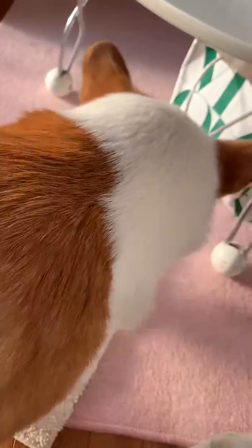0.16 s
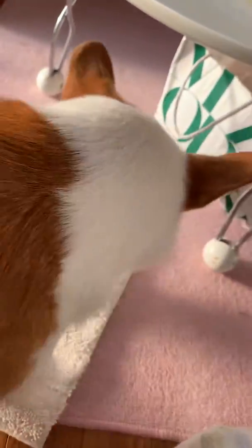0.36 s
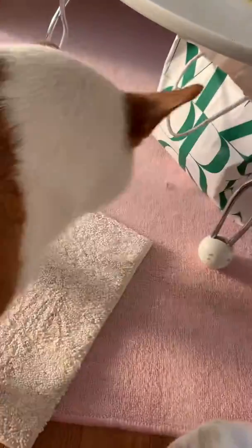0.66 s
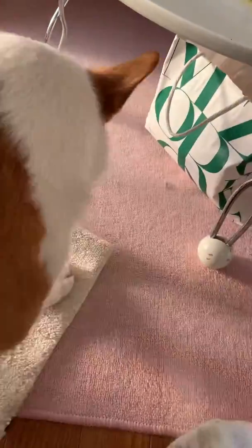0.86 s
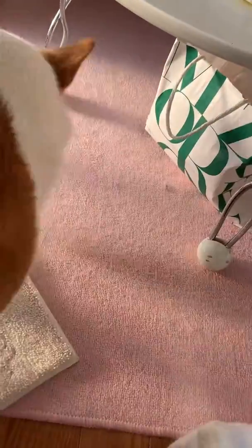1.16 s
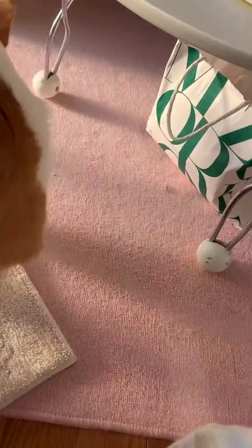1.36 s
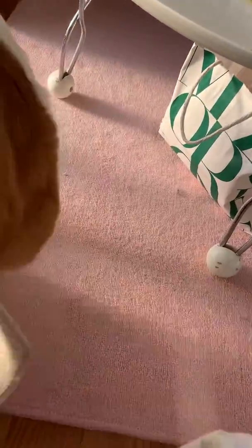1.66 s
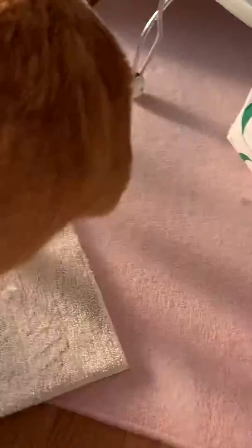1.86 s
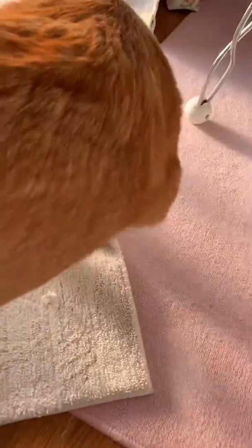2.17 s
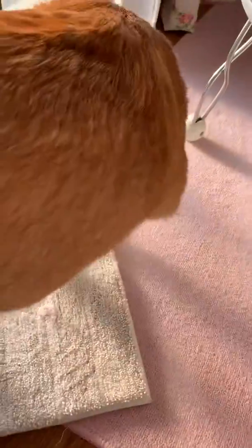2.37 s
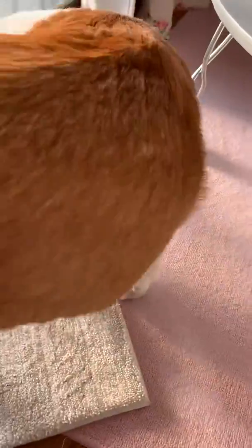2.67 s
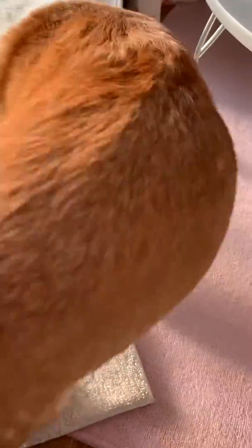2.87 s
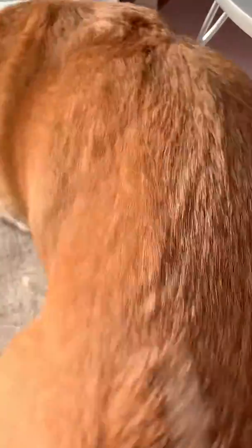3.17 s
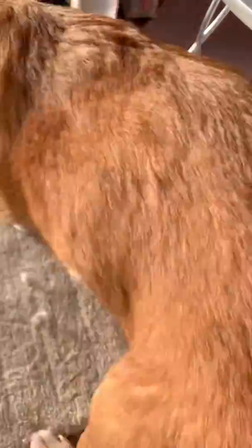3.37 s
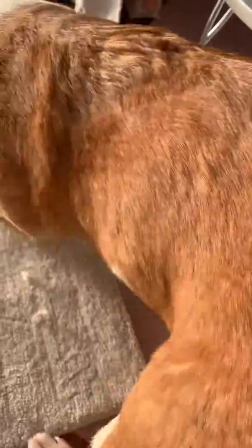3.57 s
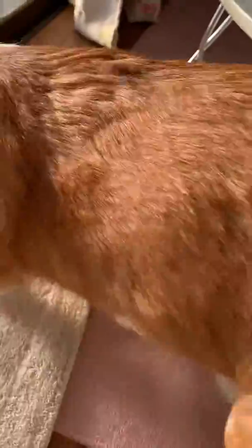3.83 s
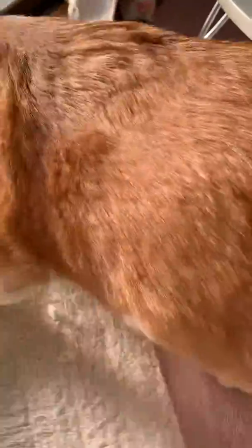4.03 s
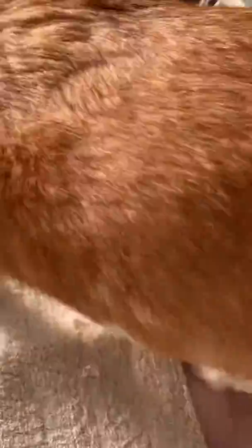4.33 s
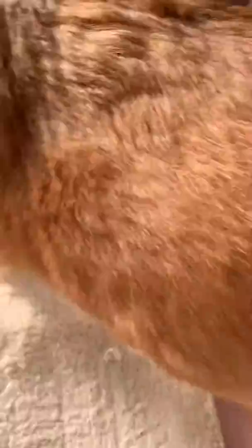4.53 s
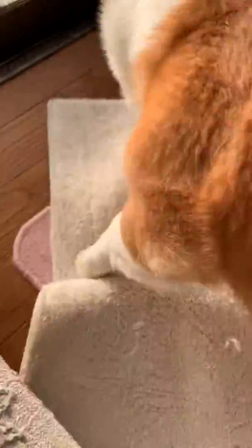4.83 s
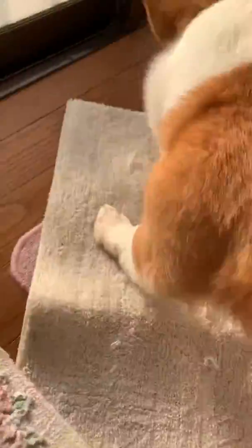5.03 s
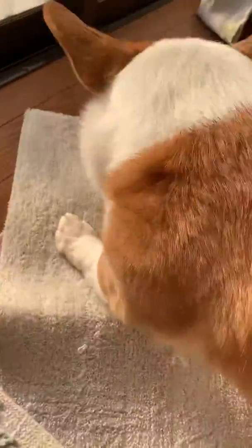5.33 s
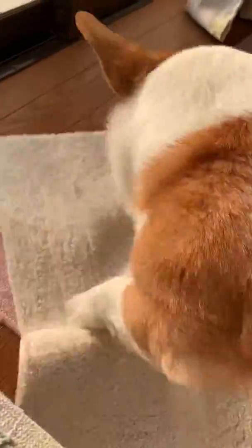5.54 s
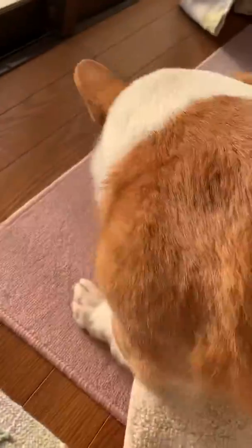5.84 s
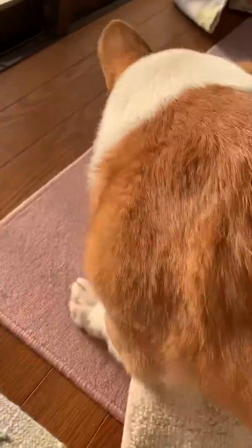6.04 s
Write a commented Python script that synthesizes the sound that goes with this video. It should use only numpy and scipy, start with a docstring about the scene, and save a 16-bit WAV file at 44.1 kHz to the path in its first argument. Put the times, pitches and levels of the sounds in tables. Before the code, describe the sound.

Close in a small quiet room, a dog scratches at a terry towel on a rug over a wooden floor. Four quick scraping strokes with dull paw thumps come first, then a lighter shuffle of soft scuffs, footfalls and small claw ticks, then a longer second bout of heavier rasping drags and thuds. Low floor booms sit underneath, with close stereo hand-held sound.

```python
"""Dog digging at a towel

A dog digs at a terry towel on a rug over a wooden floor, close to a hand-held camera in a small room.
Strokes are slipping-fibre noise: a swish of loops, a rub of folds and a juddering drag on the boards.
Paws land as damped board modes with a claw knock; between two bouts the dog shuffles round with scuffs,
claw ticks of short ringing modes and dull booms of low decaying sines, over quiet room air."""
import sys
import numpy as np
from scipy import signal
from scipy.fft import rfft, irfft, next_fast_len
from scipy.io import wavfile
from scipy.ndimage import uniform_filter1d, map_coordinates

SR = 44100
rng = np.random.default_rng(int(sys.argv[2]) if len(sys.argv) > 2 else 0)


def to_wav(sig):
    """Store sig (one row per channel, or 1-D mono) as 16-bit WAV at the path in sys.argv[1].

    Samples outside -1..1 are clipped; the rate is SR.
    """
    pcm = np.clip(np.atleast_2d(sig), -1, 1) * 32767
    pcm = np.round(pcm).astype(np.int16)
    wavfile.write(sys.argv[1], SR, pcm.T)  # frames by channels


N = 273420


def amp(db):
    """Decibels to gain."""
    return 10 ** (np.asarray(db) / 20)


def unit(x):
    """Scale to rms 1."""
    return x / np.sqrt(np.mean(x ** 2) + 1e-20)


def along(points, hz):
    """(Hz, value) points read on a log frequency axis."""
    f, v = np.transpose(points)
    return np.interp(np.log(hz + 1), np.log(f + 1), v)


def wobble(rate):
    """A smooth random curve with rate knots a second."""
    knots = rng.standard_normal(int(N * rate / SR) + 4)
    return map_coordinates(knots, [np.arange(N) * rate / SR])


def filtered(x, response):
    """x times a complex response of frequency."""
    n = x.shape[-1]
    m = next_fast_len(n + SR // 10)
    return irfft(rfft(x, m) * response(np.fft.rfftfreq(m, 1 / SR)), m)[..., :n]


def coloured(x, spectrum):
    """x shaped by a spectrum, at rms 1."""
    return unit(filtered(x, lambda hz: amp(along(spectrum, hz))))


def add(track, s, sound):
    """Mix a sound into the track at time s in seconds."""
    part = track[..., max(0, round(s * SR)):][..., :sound.shape[-1]]
    part += sound[..., :part.shape[-1]]


def burst(spectrum, t, t60, rise):
    """A brief contact noise that dies away by 60 dB in t60 seconds."""
    noise = coloured(rng.standard_normal((2, len(t))), spectrum)
    return noise * amp(-60 * t / t60) * (1 - np.exp(-t / rise))


def in_room(x, wet_db):
    """The answer of nearby furniture and walls: a noise tail with its own decay in each band."""
    # Each row: frequency in Hz, decay time t60 in s
    room_decay = [(100, 0.23), (350, 0.12), (1000, 0.15), (4000, 0.23), (14000, 0.026)]
    hz, t, z = signal.stft(rng.standard_normal((2, SR // 3)), SR, nperseg=256)
    decay = amp(-60 * t / along(room_decay, hz)[:, None])
    tail = signal.istft(z * decay, SR, nperseg=256)[1]
    # the reflections fade in over about 2 ms
    tail = tail * (1 - np.exp(-(np.arange(tail.shape[1]) / SR / 0.0021) ** 2))
    echo = signal.fftconvolve(x, tail / np.linalg.norm(tail[0]), axes=1)[:, :x.shape[1]]
    return x + amp(wet_db) * echo


def background(drag_db):
    """Quiet room air, and a low rumble that follows the level of the dog's dragging movement."""
    # Rumble and room-air spectra. Each row: frequency in Hz, relative level in dB
    sway_spectrum = [(15, -32.5), (30, -19), (50, -4), (80, -10), (130, -11.5), (300, -40.5), (700, -59)]
    air_spectrum = [(20, -3), (55, 4.5), (120, 4.5), (250, -5), (500, -17.5), (1000, -33), (3000, -34),
                    (8000, -34.5), (16000, -37)]
    movement_db = uniform_filter1d(drag_db, size=SR // 5)  # averaged over 0.2 s
    sway = amp(-33.5 + 0.38 * movement_db) * coloured(rng.standard_normal((2, N)), sway_spectrum)
    air = amp(-64.0) * coloured(rng.standard_normal((2, N)), air_spectrum)
    return sway + air


def swell(start, length, rise, fall, build_db=0):
    """A slide's level in dB: it rises, moves by build_db to reach 0 over its length and falls away."""
    t = np.arange(N) / SR - start
    before = rise * np.minimum(t, 0)
    during = build_db * (np.clip(t / length, 0, 1) - 1)
    after = -fall * np.maximum(t - length, 0)
    return before + during + after


def sliding():
    """Levels in dB of swish, rub and drag: the loudest of strokes, scuffs and brushing coat."""
    # Digging strokes, then light scuffs as the dog shifts its feet. Each row: start in s, length in s,
    # swish of the loops in dB, rub of the cloth in dB, drag on the boards in dB
    strokes = [(0.353, 0.042, -82, -59.5, -46), (0.651, 0.043, -54.5, -56.5, -43.5),
               (0.887, 0.058, -55.5, -49, -38.5), (1.109, 0.07, -45, -46.5, -35.5),
               (3.68, 0.16, -50, -50, -41), (4.014, 0.1, -46.5, -49.5, -37), (4.276, 0.047, -45, -48, -35),
               (4.753, 0.085, -49, -50, -31.5), (5.126, 0.081, -61.5, -51, -36.5),
               (5.461, 0.1, -52, -53, -39), (5.598, .135, -49.5, -50.5, -37)]
    scuffs = [(0.291, 0.018, -87, -64.5, -54), (0.464, .02, -84, -79, -58),
              (0.611, 0.07, -67.5, -62.5, -49), (1.505, 0.033, -83, -69, -60),
              (1.566, 0.05, -69, -53.5, -48), (1.659, .18, -61.5, -57.5, -47),
              (2.136, 0.045, -58, -54.5, -46), (2.288, 0.04, -62, -63.5, -46),
              (2.509, 0.019, -62.5, -57.5, -46), (2.651, 0.016, -61, -55.5, -70),
              (3.029, 0.035, -64, -60, -51.5), (3.247, 0.054, -59, -57, -50),
              (3.908, 0.059, -59.5, -61.5, -55), (4.385, .035, -60.5, -70, -42),
              (4.548, 0.024, -70, -68.5, -56.5), (4.625, 0.17, -59, -75, -70),
              (4.909, 0.069, -63.5, -71, -51), (5.497, 0.036, -63.5, -63, -34),
              (5.786, 0.049, -60.5, -57, -44.5), (6.114, 0.016, -78, -74, -60.5)]
    # How swish, rub and drag (a row each) follow a stroke as the paw presses down.
    # Each row: lag in s, build-up in dB (negative eases off), rise in dB per s, fall in dB per s
    stroke_shape = [(0.002, -1.5, 507.5, 334), (0.012, -1, 457, 385), (0.04, 3.5, 343, 335.5)]
    # The coat brushing the cloth as the body moves. Each row: time in s, level in dB
    coat = [(0, -95), (0.2, -95), (0.32, -78), (0.528, -87), (0.85, -91), (1.03, -65), (1.38, -96),
            (1.93, -73), (2.05, -66.5), (2.4, -73.5), (2.92, -74.5), (3.2, -66.5), (3.5, -83.5),
            (4.1, -80.5), (5.05, -74.5), (5.38, -97), (5.85, -72), (6.0, -92)]
    # Offsets of the coat's swish, rub and drag in dB
    coat_mix_db = [-3.5, 2.5, 7.5]
    coat_db = np.interp(np.arange(N) / SR, *np.transpose(coat))
    levels = []
    for layer, (lag, build_db, rise, fall) in enumerate(stroke_shape):
        level_db = coat_db + coat_mix_db[layer]
        for s, length, *layer_db in strokes:
            stroke_db = layer_db[layer] + swell(s + lag, length, rise, fall, build_db)
            level_db = np.maximum(level_db, stroke_db)
        for s, length, *layer_db in scuffs:
            scuff_db = layer_db[layer] + swell(s, length, rise=600, fall=375)  # dB per s
            level_db = np.maximum(level_db, scuff_db)
        levels.append(level_db)
    return levels


def folds(x, patchy_db):
    """Shifting folds of cloth favour now one band, now another."""
    z = signal.stft(x, nperseg=512)[2]
    field = rng.standard_normal(z.shape[1:])
    field = uniform_filter1d(field, size=4, axis=0)  # across frequency
    field = uniform_filter1d(field, size=7, axis=1)  # across time
    return signal.istft(z * amp(patchy_db * unit(field)), nperseg=512)[1][:, :N]


def friction(spectrum, rate, spread_db, smooth, patchy_db):
    """Fibres slipping rate times a second, in uneven sizes, over a smooth hiss."""
    count = int(rate * N / SR)
    when = ((np.arange(count) + rng.random(count)) * N / count).astype(int)
    sizes = amp(spread_db * rng.standard_normal((2, count)).clip(-2, 2))
    sizes = sizes * rng.choice([-1, 1], (2, count))
    slips = np.array([np.bincount(when, size, N) for size in sizes])
    hiss = smooth * rng.standard_normal((2, N))
    return coloured(folds(unit(slips) + hiss, patchy_db), spectrum)


def towel(swish_db, rub_db, drag_db):
    """Claws comb the loops, folds rub, and the pressed paw judders over the boards."""
    # Spectra of the four frictions. Each row: frequency in Hz, relative level in dB
    swish_spectrum = [(300, -21.5), (1500, -17.5), (3000, -1.5), (5000, -2), (6000, 5), (7500, 2.5),
                      (9500, 1.5), (11500, -18.5), (13500, -16), (16000, -6)]
    sizzle_spectrum = [(4000, -29), (9000, -6), (11000, 5.5), (16000, -14.5)]
    rub_spectrum = [(150, -5), (500, 3.5), (800, -2), (1100, 0.5), (1500, 0), (2200, -2), (3000, -8),
                    (5000, -10), (9000, -23), (16000, -43)]
    drag_spectrum = [(40, -36), (110, -24), (165, 5.5), (205, -4), (260, 4), (350, 0.5), (440, -10.5),
                     (560, -12.5), (800, -16), (2000, -54.5)]
    catch = wobble(90)  # the paw catches and slips on the weave
    combing_db = swish_db + 0.29 * catch + 0.2 * wobble(67)
    loops = friction(swish_spectrum, rate=2000, spread_db=3.5, smooth=0.93, patchy_db=2)
    swish = amp(combing_db - 0.5) * loops
    # a fine sizzle grows faster than the swish, so it stands out on the strongest combing
    fine = friction(sizzle_spectrum, rate=2500, spread_db=5, smooth=.6, patchy_db=2.5)
    sizzle = amp(1.516 * combing_db + 15.0) * fine
    fibres = friction(rub_spectrum, rate=480, spread_db=5.5, smooth=.8, patchy_db=2.6)
    rub = amp(rub_db + 1.5 + 1.55 * catch) * fibres
    judder = friction(drag_spectrum, rate=150, spread_db=0.5, smooth=0.56, patchy_db=-1)
    drag = amp(drag_db - 2.5 + 3.8 * catch) * judder
    return in_room(swish + sizzle + rub + drag, wet_db=-12)


def paws(knock_hz=850, knock_t60=0.012):
    """Each padded blow rings the boards briefly; the knock of the claws rises faster than the thump."""
    # Paws landing. Each row: start in s, level in dB, hard knock of the claws in dB,
    # weight on the pad in dB
    landings = [(0.296, -46.5, -5, 3), (0.375, -24.5, -13, -7), (0.391, -22, -20, -8.5),
                (0.466, -43.5, -1.5, -14), (0.677, -29, -7, -11.5), (0.701, -27, -18, -32),
                (0.723, -27.5, -19, -18.5), (0.946, -35, 0, 2.5), (0.966, -23, -10, -18),
                (1.158, -24.5, -1, -19), (1.211, -22, -21, -21), (1.57, -31, -12, -9.5),
                (1.659, -35, -5, -4.5), (1.977, -29, -10.5, -14.5), (2.316, -29, -31, -14),
                (2.43, -27.5, -20, -30), (2.457, -27.5, -15.5, -31), (2.779, -35, -12.5, -16),
                (3.517, -42.5, -24, -38), (3.777, -24, -21, -22), (3.805, -22, -21, -25.5),
                (4.119, -15.5, -13.5, -33.5), (4.15, -29, -6.5, -14), (4.354, -30.5, 3.5, 1),
                (4.379, -25, -7, -10), (4.748, -24, -8, -21), (4.811, -17, -5, -29),
                (4.836, -16.5, -35, -16.5), (4.859, -11.5, -20, -23.5), (5.006, -34.5, -35, -11.5),
                (5.143, -29, -7.5, -1.5), (5.171, -26, -7, -4), (5.23, -19.5, -31, -29),
                (5.514, -27.5, -10, -6.5), (5.723, -26, -19, -0.5), (5.739, -24.5, -7.5, -5),
                (6.115, -42.5, -18, 1)]
    # Boards under the rug. Each row: centre frequency in Hz, relative level in dB, t60 in s
    boards = [(164.9, 5, 0.14), (185, -4.5, 0.13), (262.2, -6.5, 0.14), (311.6, 2.5, 0.042),
              (346.3, -4.5, 0.1), (390.7, -9, 0.071), (601, -11, 0.041)]
    # Noise of the knock. Each row: frequency in Hz, relative level in dB
    knock_spectrum = [(150, -24), (450, 6.5), (850, 7), (1200, 0), (1800, -4.5), (3000, -15.5),
                      (6000, -25.5), (16000, -38)]
    out, t = np.zeros((2, N)), np.arange(SR // 3) / SR
    hz, mode_db, t60 = np.transpose(boards)[:, :, None]
    deep = hz < 220  # the lowest modes answer to the weight put on the paw
    for s, db, knock_db, weight_db in landings:
        size, detune = rng.standard_normal((2, len(boards), 1))
        strength_db = mode_db + 0.88 * size + deep * weight_db
        ringing = np.sin(2 * np.pi * hz * (1 + 0.028 * detune) * t)
        modes = amp(strength_db - 60 * t / t60) * ringing
        softness = amp(-.45 * (db + 18.5))  # gentle steps set in more slowly
        thump = amp(-0.5) * modes.sum(0) * (1 - np.exp(-t / (0.0039 * softness)))
        toe_hz = knock_hz * (1 + 0.096 * detune[0])
        toe = amp(4.0 - 60 * t / knock_t60) * np.sin(2 * np.pi * toe_hz * t)
        clatter = amp(0.5) * burst(knock_spectrum, t, t60=0.026, rise=0.00049)
        knock = amp(knock_db) * (toe + clatter)
        knock = knock * (1 - np.exp(-t / (0.00077 * softness)))
        add(out, s, amp(db) * in_room(thump + knock, wet_db=-8.5))
    return out


def booms(boom_hz=54, t60=0.27, rise=0.0031):
    """The whole floor gives a few slow cycles under the dog's weight."""
    # Weight coming down on the floor. Each row: start in s, level in dB
    weights = [(0.389, -41), (0.959, -36.5), (1.019, -41.5), (1.18, -30), (2.361, -42), (2.895, -33.5),
               (2.935, -35), (3.271, -39.5), (3.306, -32), (3.91, -40), (3.952, -40), (4.559, -38),
               (4.611, -42), (4.84, -41), (5.2, -32), (5.582, -38), (5.712, -34.5), (5.843, -39.5)]
    out, t = np.zeros((2, N)), np.arange(SR // 2) / SR
    for s, db in weights:
        pitch = boom_hz * np.exp(0.24 * rng.standard_normal())
        envelope = amp(db + 1.5 - 60 * t / t60) * (1 - np.exp(-t / rise))
        add(out, s, envelope * np.sin(2 * np.pi * pitch * t))
    return out


def ticks(t60=0.013, edge_hz=8000):
    """A claw taps as short ringing modes, or a thread snaps free of it with a bright click of noise."""
    # Claws ticking and snagging threads. Each row: start in s, level in dB, strength of the snap in dB
    contacts = [(1.66, -38.5, -1.5), (2.199, -60, 18.5), (2.309, -49, 4.5), (2.503, -34, -24),
                (2.512, -33, -26), (2.535, -30, -35), (2.777, -60.5, 7), (3.2548, -31.5, 7),
                (3.362, -44.5, -16), (3.4466, -58, 4), (3.8985, -43, 14.5), (4.031, -49, -7),
                (4.466, -57, 6.5), (4.644, -60.5, 20.5), (5.219, -22, -19)]
    # A claw on wood. Each row: centre frequency in Hz, relative level in dB
    claw_modes = [(1150, -23), (1550, 2), (2100, -1), (2700, -19), (3900, -12)]
    # Noise of a snapping thread. Each row: frequency in Hz, relative level in dB
    snag_spectrum = [(1000, -14.5), (3500, 0.5), (7000, 2.5), (10000, -2.5), (16000, 3.5)]
    out, t = np.zeros((2, N)), np.arange(SR // 4) / SR
    hz, mode_db = np.transpose(claw_modes)[:, :, None]
    for s, db, snap_db in contacts:
        pitch = hz * (1 + 0.064 * rng.standard_normal(hz.shape))
        modes = amp(mode_db - 60 * t / t60) * np.sin(2 * np.pi * pitch * t)
        tap = amp(-7) * modes.sum(0)
        reach = edge_hz * amp(0.29 * max(snap_db, 0))  # a stronger snap is brighter
        click = burst(snag_spectrum, t, t60=0.015, rise=0.00096)
        snap = filtered(click, lambda f: 1 / (1 + (f / reach) ** 8))
        add(out, s, amp(db) * in_room(tap + amp(snap_db + 4.0) * snap, wet_db=-11.5))
    return out


def ports(pair):
    """A shared and a diffuse part reach the two microphone ports; the treble arrives first on the left."""
    # Each row: frequency in Hz, phase lead of the left port in radians
    left_lead = [(1700, 0), (2400, .4), (3000, 2), (4000, 1.5), (5400, 3.14), (8200, 6.28), (11500, 9.42),
                 (14700, 12.57)]
    # Each row: frequency in Hz, likeness of the two ports (1 is identical)
    likeness = [(60, .997), (400, .99), (800, .9), (1700, .93), (2700, .35), (4000, .62), (5400, .97),
                (6500, .82), (8200, .97), (10000, .85), (11500, .98), (16000, .92)]

    def split(hz):
        """Gains of the shared and diffuse parts that give the likeness."""
        turn = np.arccos(np.clip(along(likeness, hz), -1, 1)) / 2
        return np.array([np.cos(turn), 1j * np.sin(turn)])

    shared, diffuse = filtered(pair, split)
    left_right = np.array([shared + diffuse, shared - diffuse])
    # half the lead goes to each side
    return filtered(left_right, lambda hz: np.exp(.5j * along(left_lead, hz) * [[1], [-1]]))


def scene():
    """Everything the dog does, heard close by through two microphone ports."""
    swish_db, rub_db, drag_db = sliding()
    digging = towel(swish_db, rub_db, drag_db)
    return ports(digging + paws() + ticks() + booms() + background(drag_db))


def record(dry):
    """The camera keeps nothing above its band limit."""
    return filtered(dry, lambda hz: hz < 15800)


dry = scene()
out = record(dry)
to_wav(out)
```